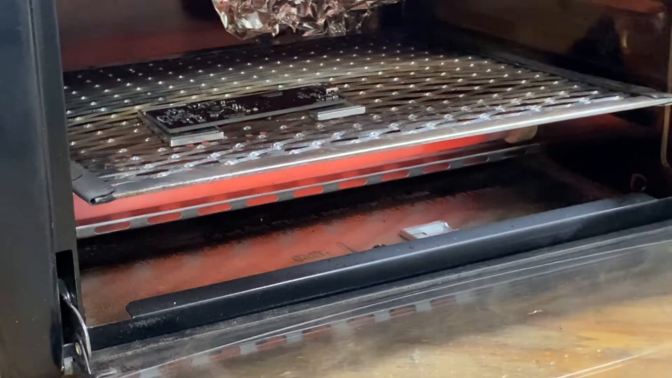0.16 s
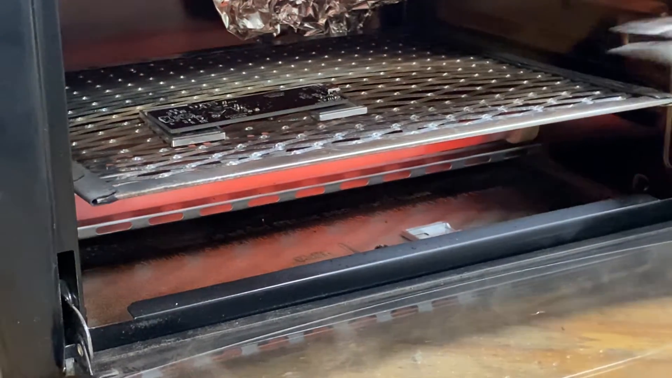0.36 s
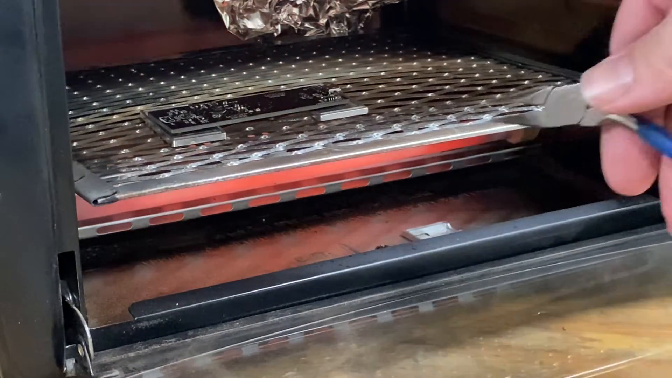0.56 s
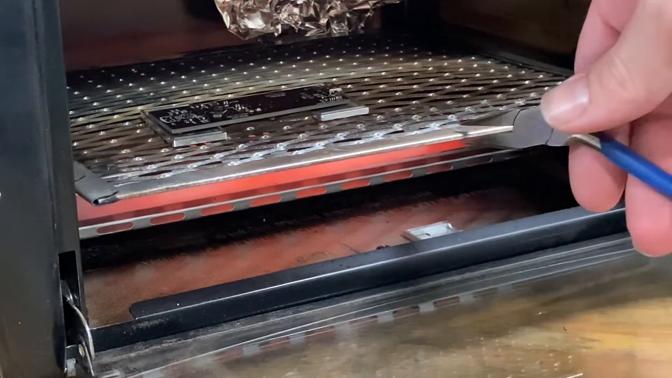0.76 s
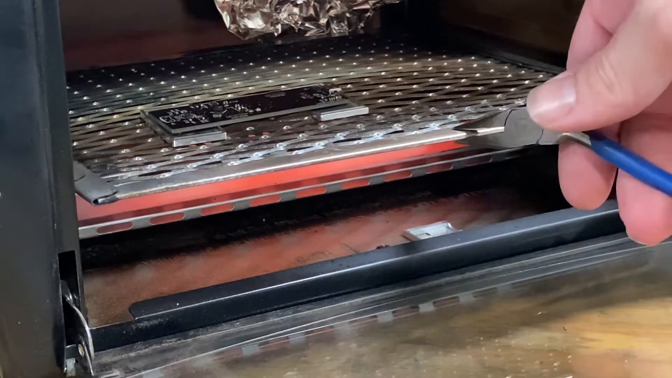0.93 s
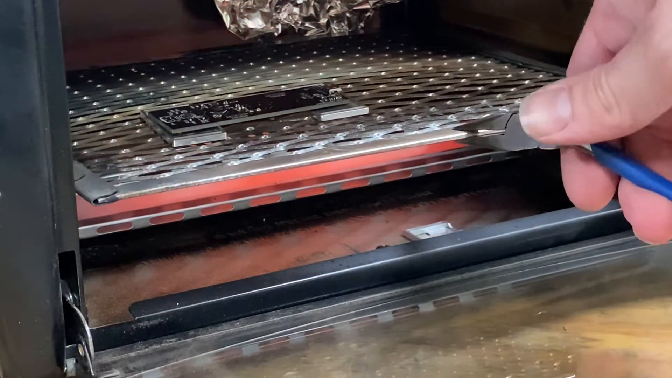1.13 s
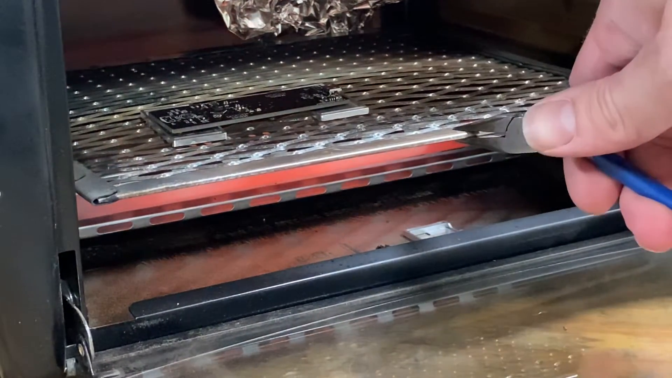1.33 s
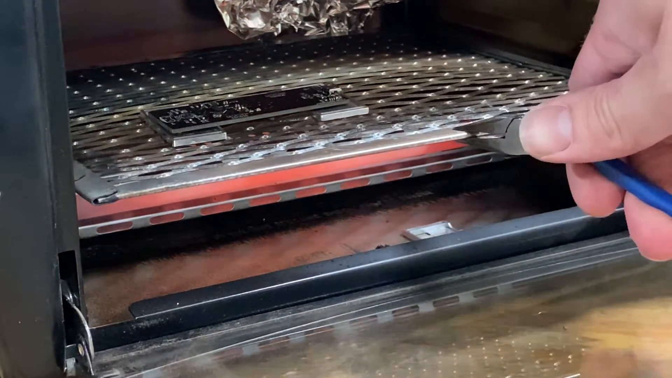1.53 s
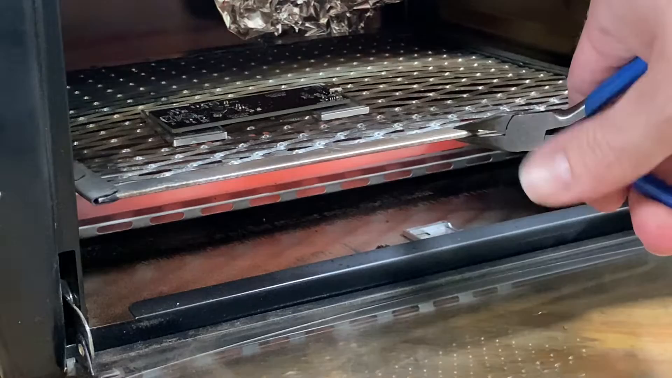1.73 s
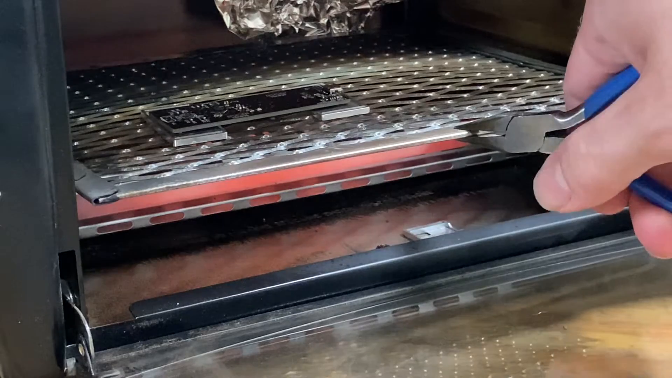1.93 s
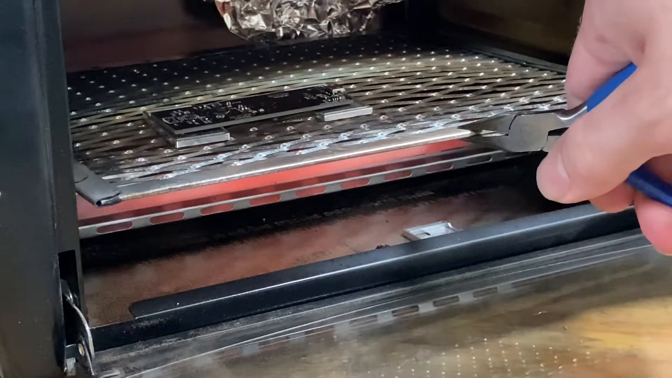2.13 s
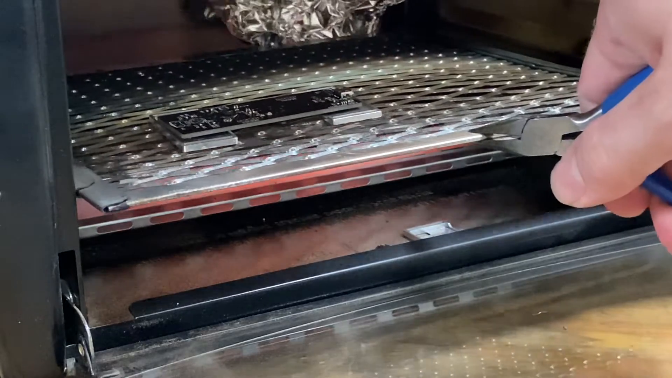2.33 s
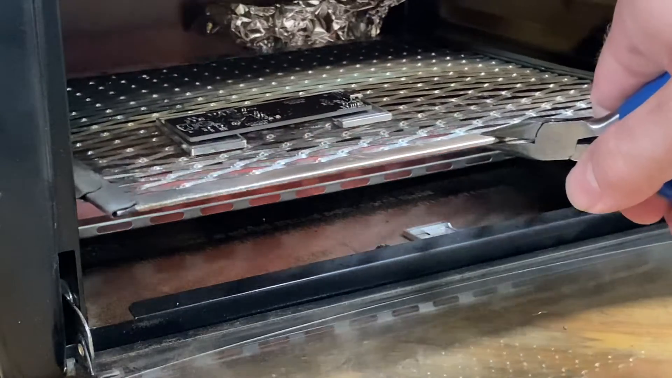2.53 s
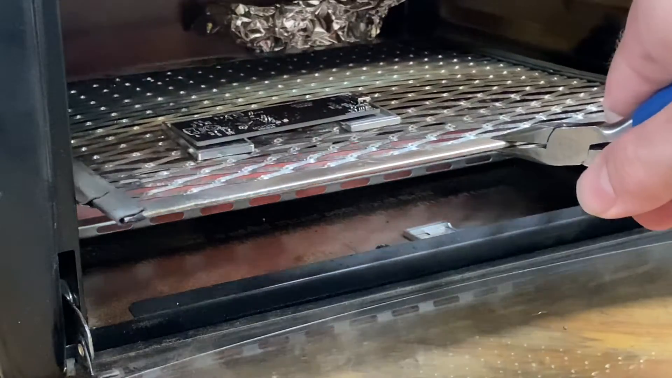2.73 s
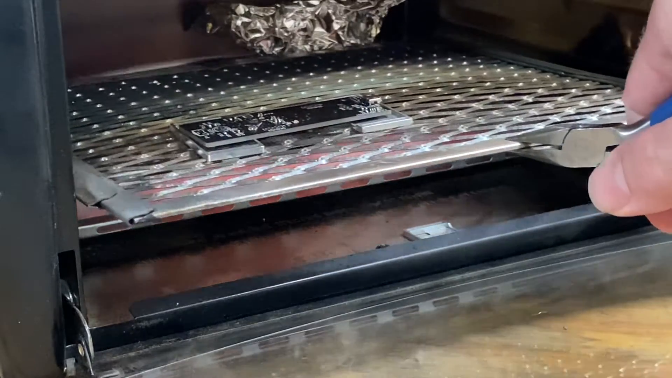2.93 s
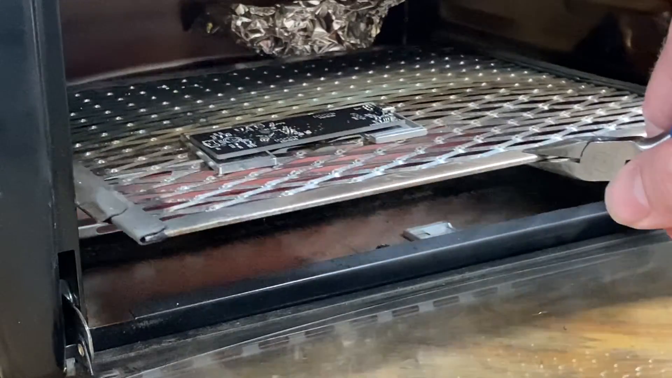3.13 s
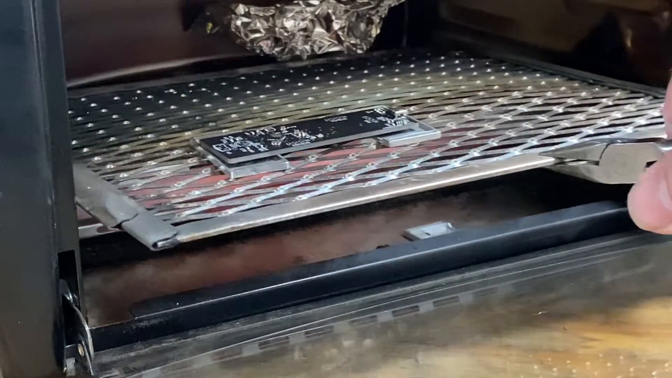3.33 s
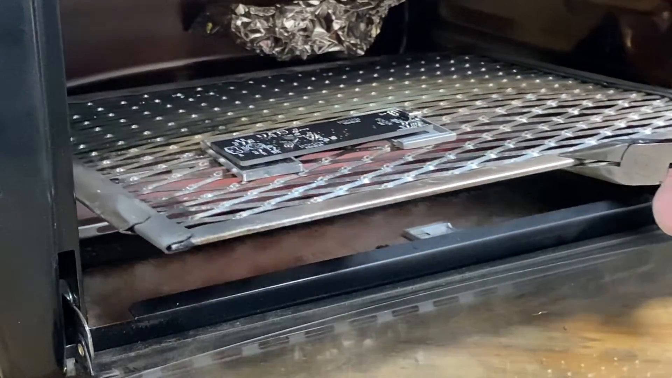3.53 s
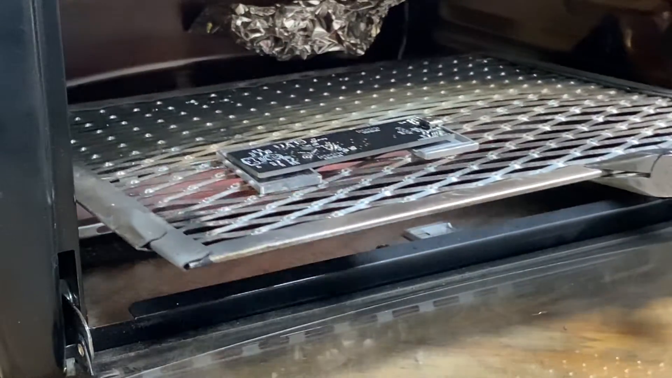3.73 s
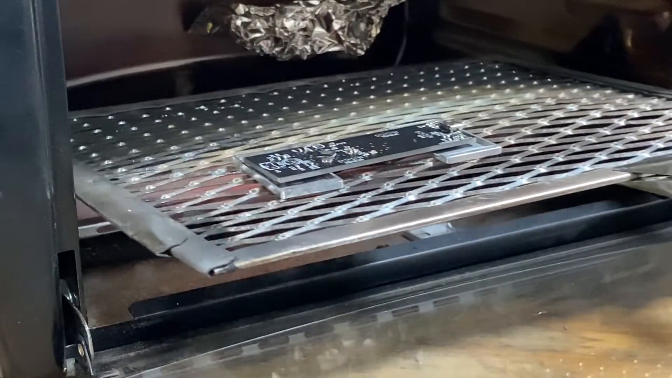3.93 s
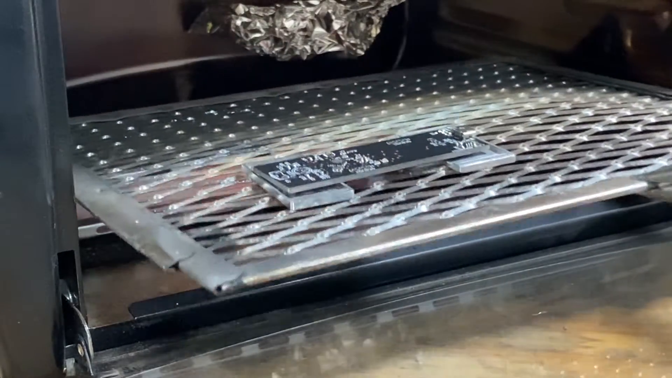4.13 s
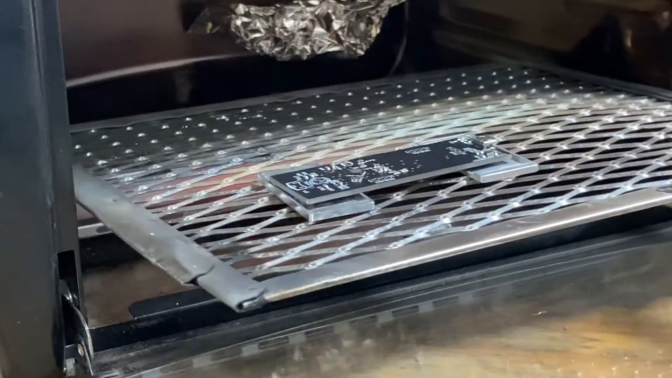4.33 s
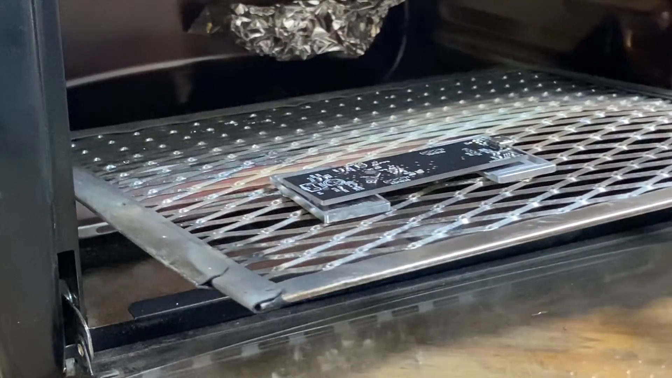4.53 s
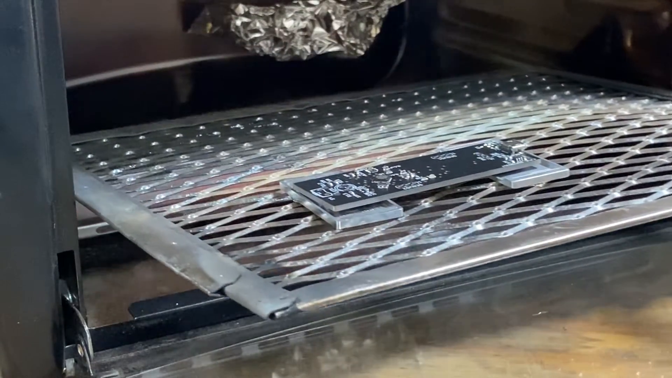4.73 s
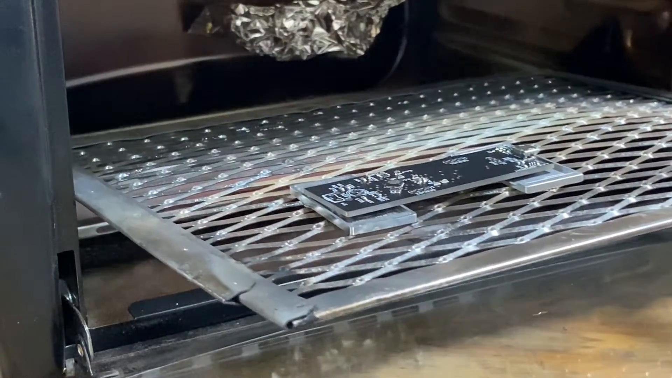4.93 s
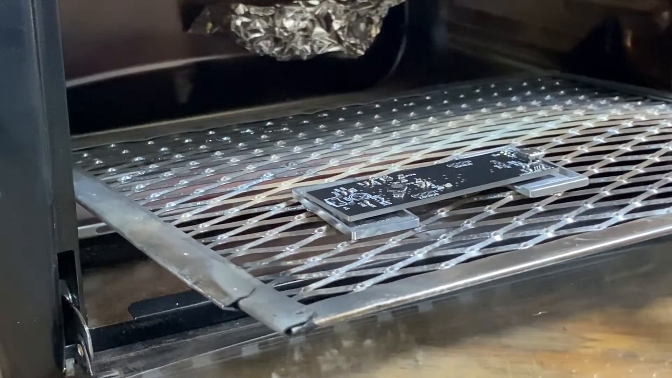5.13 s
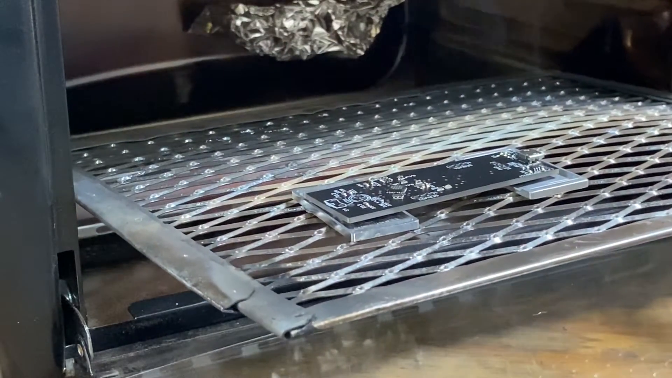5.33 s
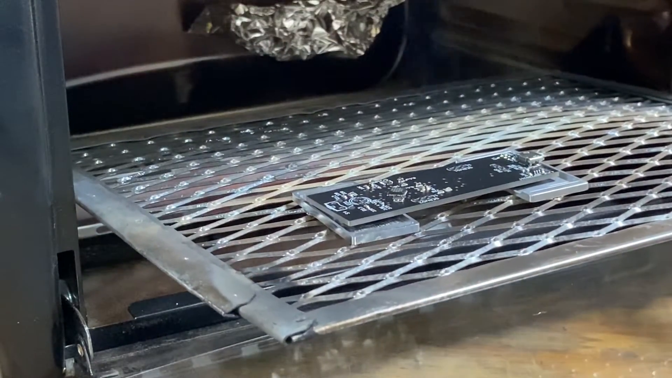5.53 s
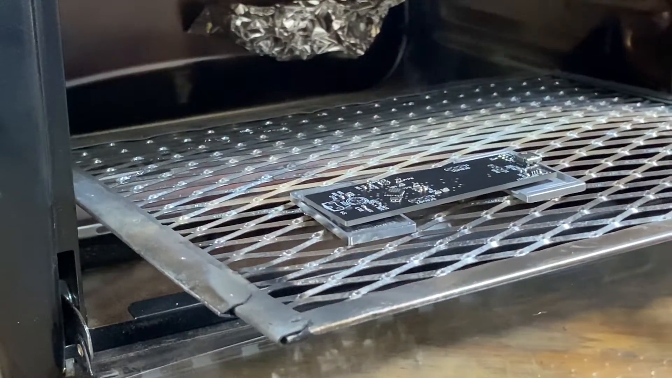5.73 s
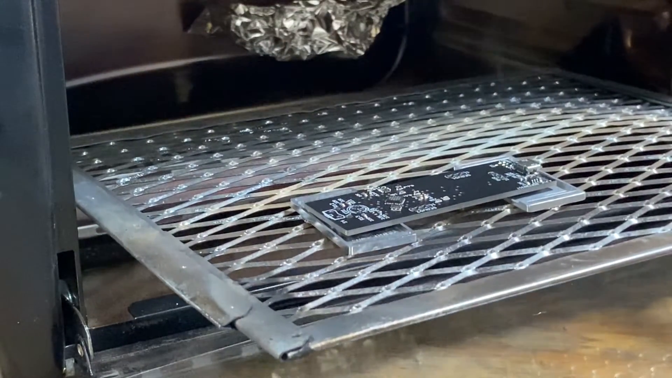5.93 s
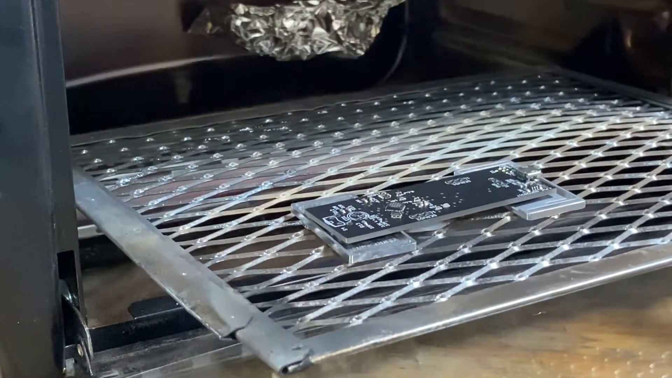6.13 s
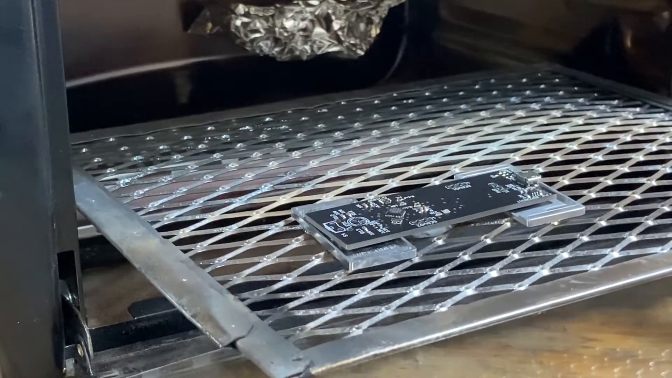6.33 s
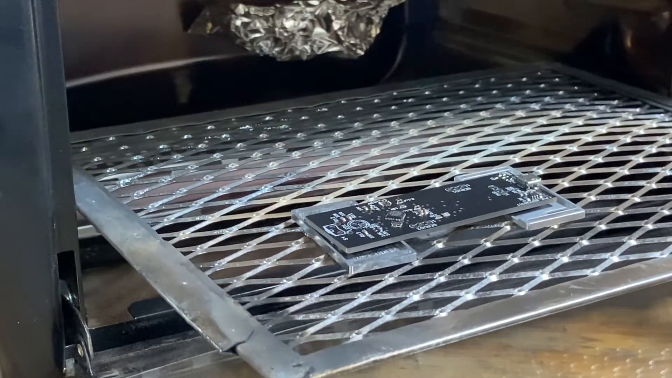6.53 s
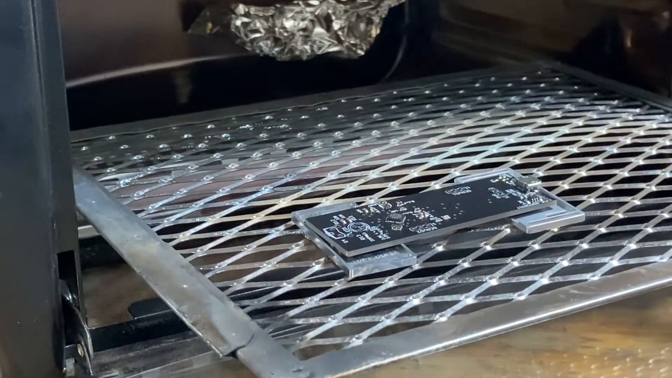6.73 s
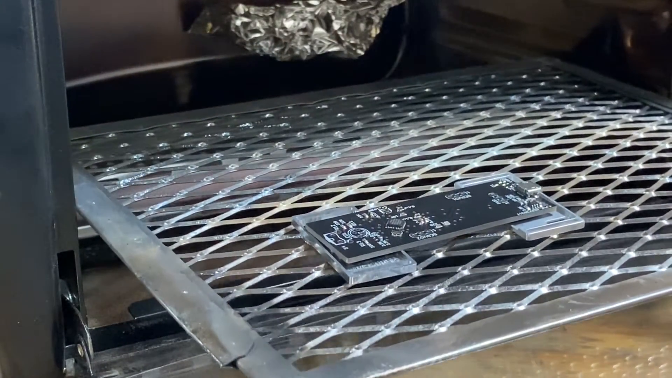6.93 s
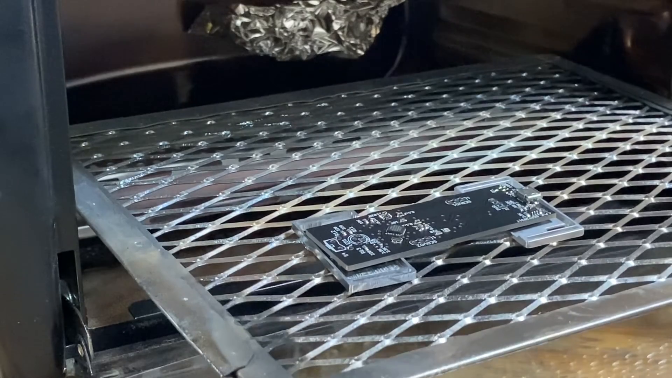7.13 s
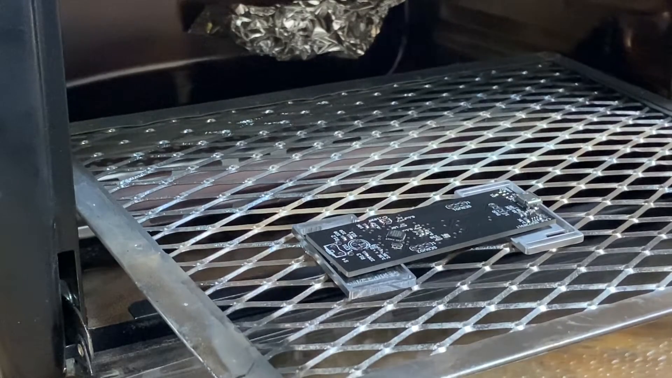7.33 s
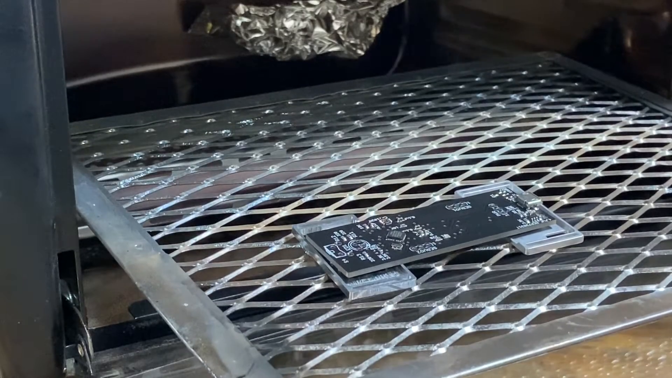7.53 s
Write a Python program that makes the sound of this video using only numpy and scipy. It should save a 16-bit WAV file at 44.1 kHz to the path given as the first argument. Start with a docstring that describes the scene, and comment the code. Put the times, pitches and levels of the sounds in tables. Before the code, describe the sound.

A low wavering rumble and soft hum run throughout. Hollow tool knocks and a faint hiss come first, followed by a tight cluster of sharp metallic clicks. Next a steel rack scrapes along its rails for about three seconds, shuddering, ringing and catching in heavy bumps, with a brief stall midway. Small light ticks end it, heard close up indoors with a short metallic box resonance.

```python
"""By a hot toaster oven, close to a phone: pliers grip the mesh rack and draw it out along its rails.
The pliers knock and slide over the counter with a faint hiss and a thin squeak that sags in pitch.
Jaws click on the rim as dense ringing; random slips make grinding, grit, shudder and singing.
The rim catches in dull jolts, and small ticks follow once the rack rests.
Shaped noise makes the room's rumble and air, sines its drone and drifting hum tones."""
import sys
import numpy as np
from scipy import signal
from scipy.fft import rfft, irfft
from scipy.io import wavfile
from scipy.ndimage import uniform_filter1d

SR = 44100
rng = np.random.default_rng(int(sys.argv[2]) if len(sys.argv) > 2 else 0)


def put_to_file(sound):
    """Save the sound as 16-bit audio at rate SR, in the file named by the first command-line argument."""
    columns = np.atleast_2d(sound).T  # one column per channel
    safe = np.clip(columns, -1, 1)
    whole_steps = np.round(safe * 32767)
    wavfile.write(sys.argv[1], SR, whole_steps.astype(np.int16))


N = 334278
TIME = np.arange(N) / SR

# Resonances of mesh and box. Each row: nominal frequency in Hz, width in Hz, level in dB above
# the dense modes, before the scatter of each contact.
RACK_MODES = [(201, 20, 3.5), (263.5, 19, 3.5), (430, 9.5, -1.5), (497, 23, 6.5), (948, 27, 11.5),
              (1024, 29, 11), (1133, 23, 10), (1328, 11, 8.5), (1650, 14, 7.5), (1730, 15, 2.5),
              (1910, 13, 2.5), (2224, 21, 3), (2500, 46, 1), (2936, 64, 6), (3120, 38, 1), (3668, 37, 9.5),
              (4180, 64, 3), (4500, 70, 5.5), (5190, 48, -1), (5320, 90, 6), (6530, 230, 4.5),
              (7440, 230, 8)]


def undb(db):
    """Decibels to gain."""
    return 10 ** (np.asarray(db) / 20)


def unit(x):
    """Scale to rms 1."""
    return x / np.sqrt(np.mean(x ** 2))


def bins(x):
    """Spectrum frequencies of x in Hz, at least 1."""
    return np.maximum(np.fft.rfftfreq(x.shape[-1], 1 / SR), 1)


def shape(points, hz):
    """Gain at hz of a colour given as (Hz, dB) points, linear in dB over log frequency."""
    points_hz, db = np.transpose(points)
    return undb(np.interp(np.log(hz), np.log(points_hz), db))


def colour(x, gain):
    """Minimum-phase filter with this gain per bin, so that resonances ring after a blow."""
    size = x.shape[-1]
    cepstrum = irfft(np.log(gain + 1e-9), size)
    # fold the cepstrum onto positive time
    cepstrum[1:size // 2] *= 2
    cepstrum[size // 2 + 1:] = 0
    return irfft(rfft(x) * np.exp(rfft(cepstrum)), size)


def stereo_noise(size):
    """Diffuse field at two close ports: independent mid and side noise, the side coloured."""
    # Each row: frequency in Hz, side minus mid in dB.
    side_colour = [(60, -18), (200, -18), (380, -14.5), (700, -4), (1300, -10.5), (2400, -18),
                   (4400, -41.5), (15000, -40)]
    mid, side = rng.standard_normal((2, size))
    side = colour(side, shape(side_colour, bins(side)))
    return np.array([mid + side, mid - side])


def fade(times_s, db):
    """Gain along a level curve, practically silent outside it."""
    return undb(np.interp(TIME, times_s, db, left=-150, right=-150))


def walk(rate_hz):
    """Smoothed random steps at rate_hz with a spread near 1."""
    hold = int(SR / rate_hz)
    steps = np.repeat(rng.standard_normal(N // hold + 1), hold)
    return unit(uniform_filter1d(steps, hold))[:N]


def add(out, start_s, sound):
    """Mix a sound in at a time."""
    i = max(int(start_s * SR), 0)
    out[:, i:i + sound.shape[-1]] += sound[..., :N - i]


def rack(x, points, modes, ringing, scatter_db=2):
    """Pass a force through the metal; random peak heights and tunings stand for the place of contact."""
    hz = bins(x)
    chance = rng.standard_normal((len(modes), 2))
    power = 1
    for (mode_hz, width_hz, db), (louder, detune) in zip(modes, chance):
        height = undb(db + scatter_db * louder) ** 2 - 1
        power = power + height / (1 + (2 * (hz - mode_hz) / width_hz + detune) ** 2)
    return colour(x, shape(points, hz) * np.maximum(power, .1) ** (ringing / 2))


def cavity(t60_s, tail_t60_s, tail_db, rise_s, size=16384):
    """Dense ringing after one contact: it builds up, dies fast in the oven and lingers in the room."""
    t = np.arange(size) / SR
    decay = undb(-60 * t / t60_s) + undb(tail_db - 60 * t / tail_t60_s)
    return stereo_noise(size) * decay * (1 - np.exp(-t / rise_s))


def crest(x, band_hz):
    """Highest rms of the mid within a band, over about 15 ms."""
    band_pass = signal.butter(2, band_hz, "band", fs=SR, output="sos")
    part = signal.sosfilt(band_pass, x.mean(axis=0))
    return np.sqrt(uniform_filter1d(part ** 2, size=660).max())


def room(rumble_db=-52.5, whine_hz=2115, whine_half_width_hz=45, whine_db=-84,
         drone_hz=206, drone_db=-68, diffuse_db=-77):
    """Wavering rumble and steady air from shaped noise, a faint narrow whine and a faint sine drone."""
    # Each row: frequency in Hz, relative level in dB.
    rumble_colour = [(20, -37), (35, -19.5), (55, 0.5), (75, 0), (110, -5.5), (150, -9.5), (205, -15.5),
                     (300, -23.5), (520, -28.5), (780, -29), (1300, -41.5), (2200, -46), (3200, -54.5),
                     (7000, -59), (15500, -64.5)]
    air_colour = [(100, -10.5), (400, 9.5), (800, -9), (1400, 0.0), (3500, -27.0), (9000, -54)]
    hz = bins(TIME)
    rumble = unit(colour(stereo_noise(N), shape(rumble_colour, hz)))
    rumble = rumble * undb(rumble_db + 1.4 * walk(4.6))
    diffuse = unit(colour(rng.standard_normal((2, N)), shape(air_colour, hz)))
    whine_gain = 1 / (1 + ((hz - whine_hz) / whine_half_width_hz) ** 2)
    whine = unit(colour(stereo_noise(N), whine_gain))
    drone = unit(np.sin(2 * np.pi * np.cumsum(drone_hz + 2 * walk(8)) / SR))
    return rumble + undb(diffuse_db) * diffuse + undb(whine_db) * whine + undb(drone_db) * drone


def clicks(gain_db=-3.5, chatter_db=-10, rebounds_per_s=1200, clank_db=-1, clank_db_per_body_db=0.089,
           hard_blow_db=-49, clank_db_per_blow_db=0.5):
    """Sharp metal contacts: a snap, a chatter of rebounds and a clank, weaker for lighter blows."""
    # Each row: start in seconds, level in dB before gain_db, body in dB up to 600 Hz,
    # treble in dB from 10 kHz, chatter decay in seconds.
    contacts = [(0.0642, -57.5, 10, -0.5, .004), (0.384, -57, 11, -2, 0.0023),
                (0.771, -56, 21.5, 3, 0.0033), (0.848, -43.5, 0, 9.5, .005), (0.8525, -42, 13.5, 2, 0.013),
                (0.925, -50.5, 13, -2, 0.0062), (0.9264, -49, 15, 7, 0.0043),
                (0.943, -58.5, 25, -25, 0.015), (1.243, -78.5, 3, 9, 0.008), (1.363, -79, -8, -6, 0.013),
                (1.488, -63, -7, 0, 0.012), (1.73, -66.5, -6, 8, 0.0089), (2.092, -62, -6, 11, .002),
                (2.2228, -60, -8, 15.5, 0.0031), (5.081, -62, -8, -12, 0.0083),
                (5.135, -70.5, 28, -7, 0.0046), (5.381, -74.5, 24, 20, .004), (5.563, -76, 0, 1, .004),
                (6.087, -73, -2, 5, 0.005), (6.488, -69.5, 2, -5, 0.0064), (7.008, -57.5, -2, 5.5, 0.011),
                (7.27, -72, 13, -4, 0.0061), (7.347, -64, 7, 5, 0.0078), (7.508, -74, -2, -7, .008)]
    # Each row: frequency in Hz, relative level in dB.
    click_colour = [(100, -23), (270, 5), (420, 0.5), (750, -1.5), (1120, 9), (1500, -1.5), (2200, 5),
                    (3000, 3), (3800, 0), (5500, 0), (8000, -10), (11000, -9), (15500, -16.5)]
    # Rim held in the jaws. Each row: nominal frequency in Hz, width in Hz, level in dB above the
    # dense modes, before ringing and scatter.
    grip_modes = [(260, 16, 5.5), (650, 30, -18), (829, 30, 7), (1045, 17, 3), (1047, 18, 9.5),
                  (1573, 24, 14.5), (2770, 18, 15), (3080, 39, 8.5), (3600, 49, 12.5), (4800, 100, 5),
                  (5400, 150, 3.5), (7900, 55, 8)]
    # Each row: nominal frequency in Hz, relative level in dB, t60 in seconds.
    clank_modes = [(825, -2, 0.089), (1050, -6, 0.1), (1030, 1, 0.027), (3020, -12, 0.18)]
    out = np.zeros((2, N))
    for start_s, db, body_db, treble_db, chatter_s in contacts:
        ring = cavity(t60_s=0.069, tail_t60_s=0.24, tail_db=1.0, rise_s=0.00032)
        t, hz = np.arange(ring.shape[-1]) / SR, bins(ring)
        rebounds = (rng.random(len(t)) < rebounds_per_s / SR) * rng.choice([-1, 1], len(t))
        force = rebounds * undb(chatter_db) * np.exp(-t / max(chatter_s, 1e-4))
        force[0] = 1  # the snap
        ring = signal.fftconvolve(ring, force[None], axes=1)[:, :len(t)]
        ring = rack(ring, click_colour, grip_modes, ringing=0.62)
        ring = colour(ring, shape([(600, body_db), (2500, 0), (4000, 0), (10000, treble_db)], hz))
        ring /= crest(ring, (2500, 8000))
        clank = 0
        for mode_hz, mode_db, t60_s in clank_modes:
            tuned_hz = mode_hz * (1 + 0.013 * rng.standard_normal())
            clank = clank + undb(mode_db - 60 * t / t60_s) * np.sin(2 * np.pi * tuned_hz * t)
        lightness_db = clank_db_per_blow_db * min(db - hard_blow_db, 0)
        clank = clank * undb(clank_db + clank_db_per_body_db * body_db + lightness_db)
        add(out, start_s, (ring + clank) * undb(db + gain_db))
    return out


def hum(levels, hz, climb_hz_per_s, drift_hz, gain_db, waver_db):
    """A low sine that drifts in pitch, swells and wavers; any climb counts from its first level."""
    times_s, db = np.transpose(levels)
    pitch_hz = hz + climb_hz_per_s * (TIME - times_s[0]) + drift_hz * walk(1.533)
    swell = uniform_filter1d(fade(times_s, db + gain_db), size=4410)
    return unit(np.sin(2 * np.pi * np.cumsum(pitch_hz) / SR)) * swell * undb(waver_db * walk(11))


def hums():
    """Three low tones in the room, two drifting about a fixed pitch and one climbing."""
    # Each row: time in seconds, level in dB before gain and waver.
    upper_levels = [(0.1, -54), (1.99, -59), (2.16, -46.5), (2.66, -56.5), (2.77, -48), (3.52, -50),
                    (3.58, -67), (4.43, -57.5), (4.87, -43.5), (4.99, -60), (5.35, -41.5), (5.77, -56),
                    (6.31, -51), (6.47, -65), (7.58, -52.5)]
    lower_levels = [(0.9, -66), (1.18, -55), (2.72, -54), (3.09, -46.5), (4.57, -55.5), (4.6, -60)]
    deep_levels = [(5.6, -64.5), (6.6, -53), (7.58, -61.5)]
    upper = hum(upper_levels, 104.2, climb_hz_per_s=0, drift_hz=0.716, gain_db=-1, waver_db=1.0)
    lower = hum(lower_levels, 70.8, climb_hz_per_s=1.9, drift_hz=0.34, gain_db=0.5, waver_db=3.0)
    deep = hum(deep_levels, 55.3, climb_hz_per_s=0, drift_hz=0.5, gain_db=-2, waver_db=0.5)
    return upper + lower + deep


def knocks(gain_db=-1, rustle_db=-9):
    """Dull, hollow knocks of the pliers in the hand: short sine modes over a soft noise thud."""
    # Each row: start in seconds, level in dB before gain_db.
    blows = [(0.156, -50.5), (0.172, -49.5), (1.496, -45.5)]
    # Each row: frequency in Hz, relative level in dB, t60 in seconds.
    knock_modes = [(337, -1.5, 0.086), (390, 5, 0.092), (483, -9, 0.077)]
    thud_colour = [(80, -20), (400, 5), (800, -21), (2000, -16), (8000, -30)]
    out = np.zeros((2, N))
    for start_s, db in blows:
        thud = cavity(t60_s=.09, tail_t60_s=0.52, tail_db=7, rise_s=0.0028)
        thud = colour(thud, shape(thud_colour, bins(thud)))
        t = np.arange(thud.shape[-1]) / SR
        ring = sum(undb(mode_db - 60 * t / t60_s) * np.sin(2 * np.pi * mode_hz * t)
                   for mode_hz, mode_db, t60_s in knock_modes)
        sound = unit(ring * (1 - np.exp(-t / 0.0016))) + undb(rustle_db) * unit(thud)
        add(out, start_s, sound * undb(db + gain_db) / crest(sound, (250, 700)))
    return out


def rubs(hiss_gain_db=0.5, body_gain_db=0, crunch_db=2.0, attack_s=0.01,
         hiss_release_db_per_s=330, body_release_db_per_s=172, size=16384):
    """Crunchy noise as the pliers slide over the counter, shift on the rim, take up the load and let go."""
    # Each row: start in seconds, length in seconds before release, hiss in dB and body in dB before gains.
    strokes = [(0.19, 0.19, -71, -75), (0.386, 0.0088, -71, -65.5), (1.486, 0.025, -68, -55.5),
               (1.735, 0.032, -70, -60.5), (1.778, 0.05, -73.5, -53.5), (2.078, 0.085, -73, -65.5),
               (7.349, 0.049, -66.5, -56.5)]
    # Each row: frequency in Hz, relative level in dB.
    hiss_colour = [(500, -30), (1500, 10.5), (3200, 2), (3900, 4), (4500, 3.5), (5000, -4), (5900, -5),
                   (6700, -14), (11000, -8), (15500, -13)]
    body_colour = [(120, -23), (280, 19.5), (500, 4), (1100, -3.5), (1800, -6), (4000, -29)]
    out, t = np.zeros((2, N)), np.arange(size) / SR
    for start_s, length_s, hiss_db, body_db in strokes:
        grains = stereo_noise(size) * undb(crunch_db * np.clip(walk(300)[:size], -1, 1))
        layers = ((hiss_colour, hiss_db + hiss_gain_db, hiss_release_db_per_s),
                  (body_colour, body_db + body_gain_db, body_release_db_per_s))
        for points, db, release_db_per_s in layers:
            release_db = release_db_per_s * np.maximum(t - length_s, 0)
            gain = np.minimum(t / attack_s, 1) * undb(db - release_db)
            add(out, start_s, unit(colour(grains, shape(points, bins(grains)))) * gain)
    return out


def squeak(start_s=0.21, length_s=0.18, start_hz=11700, sag_hz_per_s=3000, waver_hz=90, level_db=-80):
    """The pliers slide over the counter: a thin wavering sine that swells, sags in pitch and dies."""
    age_s = np.clip(TIME - start_s, 0, length_s)
    pitch_hz = start_hz - sag_hz_per_s * age_s + waver_hz * walk(600)
    tone = unit(np.sin(2 * np.pi * np.cumsum(pitch_hz) / SR))
    return tone * np.sin(np.pi * age_s / length_s) * undb(level_db)


def friction(forces, points, gain):
    """Slips at several points along the rails; each point rings the mesh in its own way."""
    power, played = 0, 0
    for force in forces:
        ring = cavity(t60_s=0.024, tail_t60_s=0.25, tail_db=-7, rise_s=0.00013, size=8192)
        ring = rack(ring, points, RACK_MODES, ringing=1.0)
        power += np.mean(force ** 2) * np.sum(ring[0] ** 2)
        played = played + signal.oaconvolve((force * gain)[None], ring, axes=1)[:, :N]
    return played / np.sqrt(power)


def slide(slips_per_s=2100, scatter_db=4, judder_db=1.5, grind_db=-51.5, grit_db=-59, shudder_db=-51,
          steady_pull_db=-51, grit_growth=0.84, shudder_growth=0.62, shudder_rise_db_per_s=1.46, count=5):
    """Steel drags over steel in uneven slips bunched into a judder; harder pulls raise every layer."""
    # Force of grinding in two pulls, a brief stall between. Each row: time in seconds, level in dB.
    first_pull = [(1.97, -73), (2.13, -67), (2.14, -67), (2.26, -51), (2.54, -48), (2.57, -58), (2.87, -51),
                  (2.98, -55.5), (3.1, -42), (3.12, -49.5), (3.55, -54), (3.57, -47), (3.78, -43),
                  (3.88, -50), (4.0, -47), (4.07, -67)]
    second_pull = [(4.085, -60), (4.093, -54), (4.123, -43), (4.195, -48.5), (4.231, -52), (4.291, -44.5),
                   (4.457, -52), (4.765, -56), (4.875, -64), (5.009, -56.5), (5.065, -74), (5.081, -58.5),
                   (5.23, -91)]
    # Each row: frequency in Hz, relative level in dB.
    grind_colour = [(120, -6.5), (400, -4.5), (600, 9), (850, 3), (1100, -1.5), (1300, 0), (2000, -3),
                    (3000, -11), (6000, -38)]
    grit_colour = [(900, 1), (2200, -1), (3200, 5), (5000, 2), (7500, -5.5), (11000, -4), (15500, -9.5)]
    shudder_colour = [(60, -27), (140, -6), (200, -1), (290, 2.5), (390, -8), (500, -9.5), (750, -36),
                      (2000, -57)]
    times_s, pull_db = np.transpose(np.vstack([first_pull, second_pull]))
    effort = fade(times_s, pull_db - steady_pull_db)
    # the further the rack overhangs its rails, the more it shudders; the rise is linear in time
    overhang_db = shudder_rise_db_per_s * (TIME - times_s[0])
    slip_db = scatter_db * np.clip(rng.standard_normal(N), -2, 2) + judder_db * walk(80)
    slips = (rng.random(N) < slips_per_s / SR) * undb(slip_db) * rng.choice([-1, 1], N)
    corner = rng.integers(0, count, N)
    # the load wanders among the corners while the hand keeps an even pull
    forces = np.array([slips * (corner == k) * undb(4.9 * walk(7)) for k in range(count)])
    forces /= np.sqrt(uniform_filter1d(np.sum(forces ** 2, axis=0), size=3500) + 1e-9)
    grind = friction(forces, grind_colour, undb(grind_db) * effort)
    grit = friction(forces, grit_colour, undb(grit_db) * effort ** grit_growth)
    shudder = friction(forces, shudder_colour, undb(shudder_db + overhang_db) * effort ** shudder_growth)
    return grind + grit + shudder + singing(forces.sum(axis=0))


def singing(slips, edge_s=.03):
    """The same slips pump single resonances, which swell and fall silent as the contact moves on."""
    # Each row: start in seconds, end in seconds, frequency in Hz,
    # a third of each pole's bandwidth in Hz, level in dB before the edge fades.
    notes = [(2.2, 2.6, 1000, 110, -53.5), (2.6, 3.35, 960, 70, -52.5), (3.35, 4.0, 960, 70, -54.5),
             (4.09, 4.36, 945, 55, -52), (3.0, 3.13, 3690, 45, -62), (3.05, 3.7, 5420, 50, -72),
             (3.62, 3.87, 7490, 80, -68), (4.11, 4.22, 2770, 80, -61), (4.11, 4.24, 4090, 40, -59),
             (4.24, 4.35, 4060, 40, -60)]
    out = np.zeros((2, N))
    for start_s, end_s, note_hz, width_hz, db in notes:
        pole = np.exp((2j * np.pi * note_hz - 3 * np.pi * width_hz) / SR)
        drive = slips[int(start_s * SR):int(end_s * SR)]
        ring = signal.lfilter([1], np.poly([pole, pole]), drive).real
        t = np.arange(len(ring)) / SR
        edges = np.clip(np.minimum(t, t[::-1]) / edge_s, 0, 1)
        add(out, start_s, unit(ring) * edges * undb(db))
    return out


def bumps(gain_db=-7):
    """The rim catches on the rails and jumps: heavier, duller bursts through the rack's modes."""
    # Each row: start in seconds, level in dB before gain_db.
    jolts = [(2.872, -42.5), (3.015, -43), (3.175, -41), (3.235, -45), (3.594, -45), (3.638, -41),
             (3.718, -44), (3.751, -39.5), (4.183, -38.5), (4.283, -47), (4.578, -48), (4.982, -52.5)]
    jolt_colour = [(80, -17), (270, 7.0), (500, -1.0), (1000, -5), (1500, -16.5), (4000, -23), (15000, -28.0)]
    out = np.zeros((2, N))
    for start_s, db in jolts:
        ring = cavity(t60_s=0.037, tail_t60_s=0.1, tail_db=-1.5, rise_s=0.00076)
        ring = rack(ring, jolt_colour, RACK_MODES, ringing=1.0)
        add(out, start_s, ring * undb(db + gain_db) / crest(ring, (700, 2500)))
    return out


def scene():
    """Pliers and rack over the hum of the room."""
    return room() + clicks() + hums() + knocks() + rubs() + squeak() + slide() + bumps()


def record(dry, top_hz=15800, pad=2048):
    """The phone delays the top octave of its left channel and cuts the highest treble."""
    # Each row: frequency in Hz, lag in turns of phase.
    port_lag = [(7400, 0), (10900, 1), (11500, 1), (15100, 2)]
    left = np.pad(dry[0], pad, mode="reflect")
    turns = np.interp(bins(left), *np.transpose(port_lag))
    left = irfft(rfft(left) * np.exp(-2j * np.pi * turns), len(left))[pad:-pad]
    low_pass = signal.ellip(10, .2, 70, top_hz, fs=SR, output="sos")
    return signal.sosfilt(low_pass, np.array([left, dry[1]]))


dry = scene()
out = record(dry)
put_to_file(out)
```